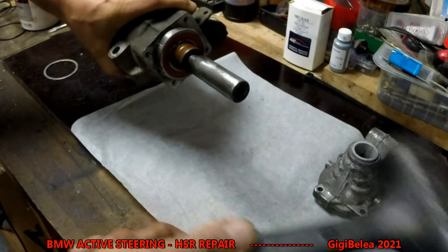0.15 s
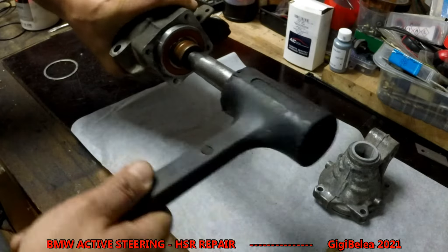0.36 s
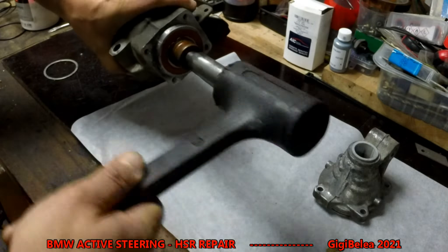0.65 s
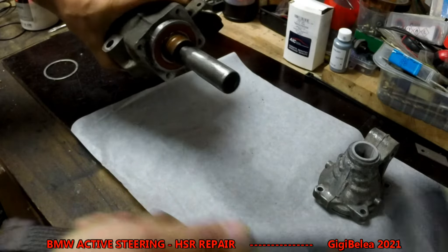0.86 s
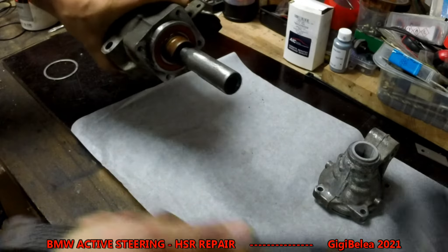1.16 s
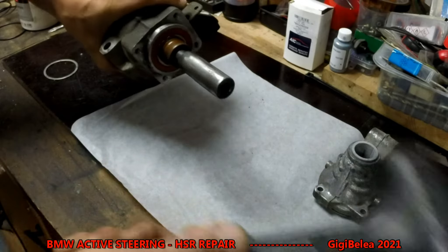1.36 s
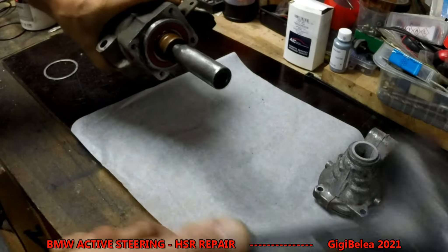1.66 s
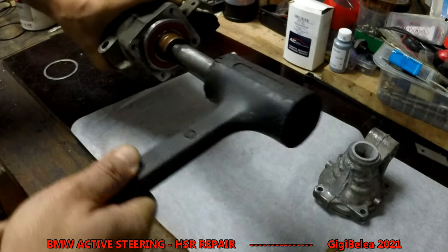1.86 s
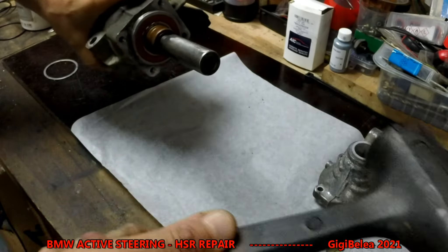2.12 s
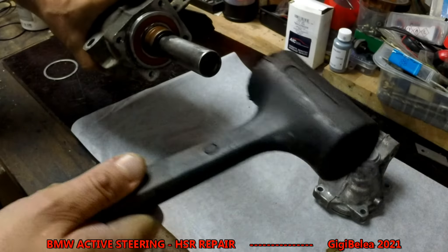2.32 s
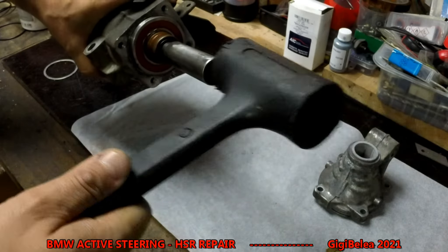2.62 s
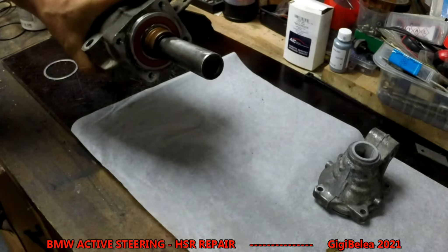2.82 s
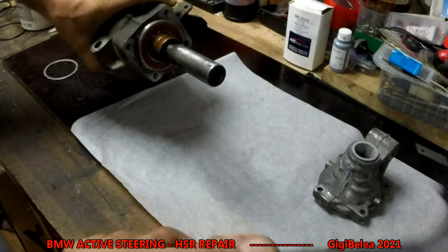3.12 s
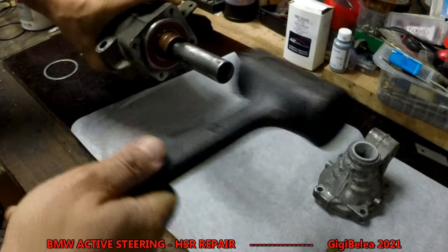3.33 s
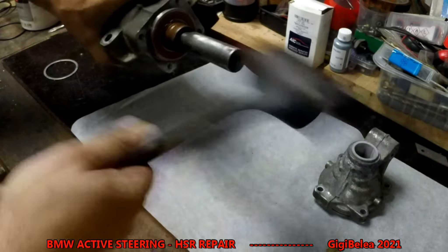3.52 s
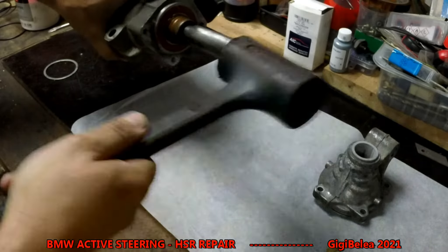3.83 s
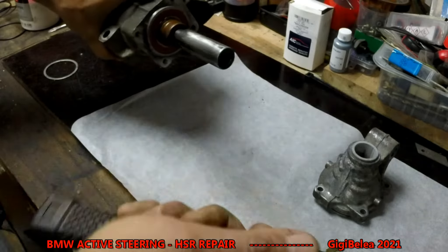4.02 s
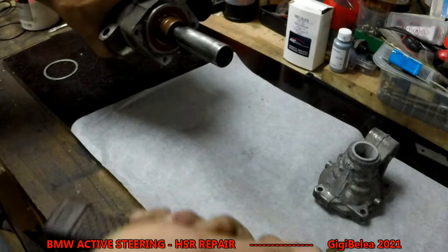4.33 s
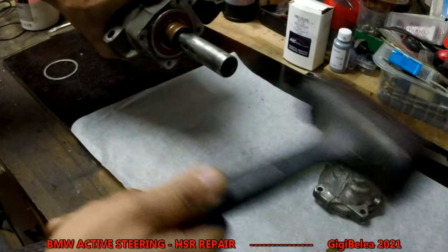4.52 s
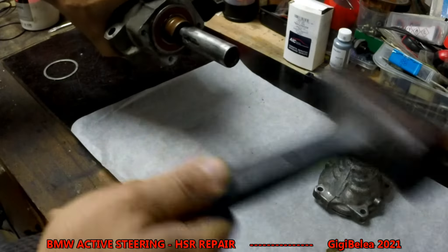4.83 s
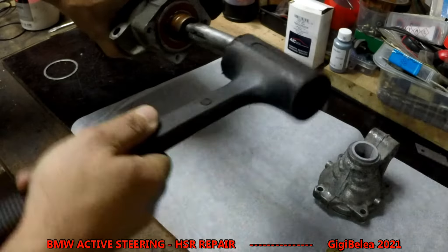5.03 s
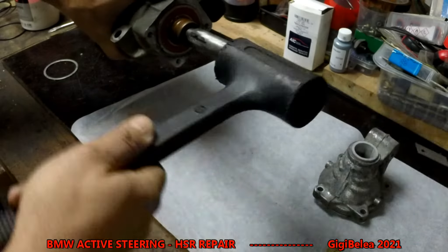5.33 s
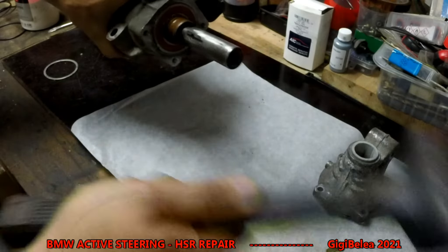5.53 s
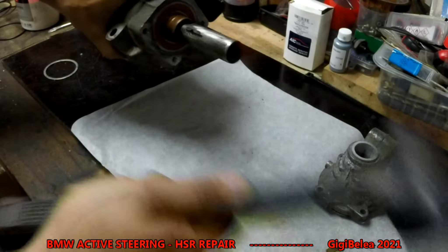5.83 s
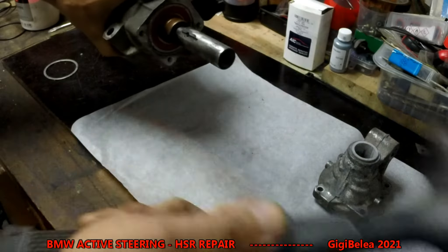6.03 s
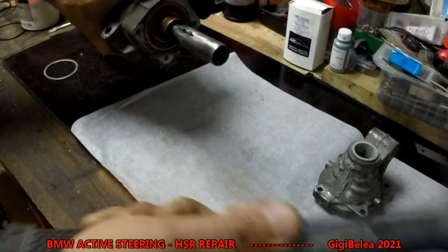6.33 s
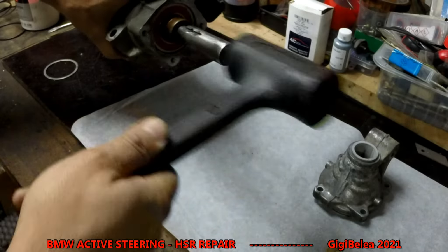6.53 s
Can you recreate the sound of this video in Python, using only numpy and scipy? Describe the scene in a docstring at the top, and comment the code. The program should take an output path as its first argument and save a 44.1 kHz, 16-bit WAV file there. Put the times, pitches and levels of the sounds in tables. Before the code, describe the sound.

A rubber hammer knocks a steel shaft in quick, even blows, pauses briefly, then carries on in a small workshop.

```python
"""A brief hiss runs into a sharp knock: a rubber dead-blow hammer is tapping a bearing along a steel
shaft into an aluminium housing, seven blows, a pause, then thirteen more. Loose shot in the hammer's
head slides back on each swing and crashes forward on impact. Each blow excites damped modes of hammer,
shaft and housing; the bench rings and a small workshop reverberates. A limiter holds the blows near
full scale and lets the room noise swell in the pause."""
import sys
import numpy as np
from scipy import signal
from scipy.fft import rfft, irfft, next_fast_len
from scipy.io import wavfile
from scipy.ndimage import uniform_filter1d, minimum_filter1d

SR = 44100
rng = np.random.default_rng(int(sys.argv[2]) if len(sys.argv) > 2 else 0)


def output_pcm(signal):
    """Save a mono or channel-first signal as 16-bit PCM at the path in sys.argv[1].

    Samples are clipped to [-1, 1] before scaling.
    """
    pcm = np.clip(np.atleast_2d(signal).T, -1, 1) * 32767
    wavfile.write(sys.argv[1], SR, np.round(pcm).astype(np.int16))


N = 293868

# Spectrum of the steady workshop noise: frequency_hz, density_db
AIR_SPECTRUM = [(20, -4), (45, 3.5), (100, -2.5), (250, -6.5), (1000, -15), (3000, -23.5), (7000, -33),
                (12500, -42.5), (15500, -62)]
# Spectrum of shot sliding inside the head: frequency_hz, density_db
SLIDE_SPECTRUM = [(100, -6.5), (300, 1), (1200, -2.5), (2000, -1.5), (3500, -8.5), (7000, -12),
                  (10000, -18.5), (15000, -47)]
# Hammer blows, with sharpness relative to an average blow: start_s, sharpness_db
BLOWS = [(0.0574, 2.5), (0.3625, -1), (0.666, -3), (0.9686, 0.9), (1.2677, 0.5), (1.5622, 4.5), (1.8633, 1),
         (2.993, 1.6), (3.3017, 3.5), (3.5981, -2.5), (3.8866, 4.5), (4.18, -1.5), (4.473, 1),
         (4.7643, -0.7), (5.0549, 0.1), (5.347, -1.4), (5.6355, 1.4), (5.9298, -2), (6.2206, -5),
         (6.5151, -1)]
# Hand-damped modes of hammer, shaft and housing: pitch_hz, level_db, t60_s
BODY_MODES = [(437.8, -20.5, 0.032), (529.6, -5.0, 0.027), (605, 2.5, 0.012), (570, 3.0, 0.0071),
              (829.5, -6, 0.032), (1241, -10.5, 0.018), (1267, 4, 0.005), (1711, 3.5, 0.0037),
              (1904, -9.5, 0.0075)]
# Spectrum of shot striking the hammer's face: frequency_hz, density_db
CRASH_SPECTRUM = [(300, -23.5), (1200, -1.5), (2200, 0), (2800, -7), (3350, -7.5), (3700, -10.5),
                  (4300, -6.5), (5000, -12.5), (7100, -13.5), (8000, -21), (9200, -20.5), (10300, -26),
                  (11500, -36), (13500, -39), (15500, -56)]
# Faint modes of the steel shaft and bearing: pitch_hz, level_db
STEEL_MODES = [(3913, -5), (4182, -3.5), (4302, 1), (4485, -5), (4560, -3.5), (7077, -9)]
# Lingering resonances of bench and room: pitch_hz, level_db
BENCH_MODES = [(305, -19.5), (512, -3.5), (560, -6), (616, -5), (638, -7), (708, -5), (778, -6.5), (816, 1),
               (853, 0.5), (912, -5.5), (985, -7), (1009, -1.5), (1071, -9.5), (1160, -15.5)]
# Spectrum of the knock as the room returns it: frequency_hz, density_db
ECHO_SPECTRUM = [(150, -35.5), (220, -21), (310, -8), (430, -13.5), (500, 2), (700, -2), (840, 1),
                 (1000, -1.5), (1300, -13.5), (1600, -7), (2050, -15), (2900, -41.5), (6000, -68)]
# Reverberation time of the workshop: frequency_hz, t60_s
REVERB_TIMES = [(200, 0.33), (400, 0.42), (520, 0.43), (2000, 0.48), (5000, 0.67), (9000, 0.54),
                (14000, 0.19)]


def amp(db):
    """Amplitude grows tenfold for every 20 dB."""
    return 10 ** (np.asarray(db) / 20)


def unit_energy(x):
    """Normalisation: the squared samples sum to 1."""
    return x / np.sqrt(np.sum(x ** 2) + 1e-20)


def curve_at(points, hz):
    """Interpolation of (frequency_hz, value) points on a logarithmic frequency axis."""
    frequencies, values = np.transpose(points)
    return np.interp(np.log(hz + 1), np.log(frequencies), values)


def noise(spectrum, size):
    """Spectral shaping turns white noise into coloured noise of rms 1."""
    gain = amp(curve_at(spectrum, np.fft.rfftfreq(size, 1 / SR)))
    white = rfft(rng.standard_normal(size))
    return unit_energy(irfft(white * gain, size)) * np.sqrt(size)


def decay(t, t60_s):
    """Exponential decay: a free vibration loses 60 dB in t60_s."""
    return amp(-60 * t / t60_s)


def add(track, start_s, sound):
    """Superposition: a sound adds to the track from start_s, trimmed at both ends."""
    start = round(start_s * SR)
    part = sound[max(-start, 0):max(N - start, 0)]
    track[max(start, 0):][:len(part)] += part


def workshop_noise():
    """Stationary noise: a constant spectrum, strongest in the bass, lies under the scene."""
    return noise(AIR_SPECTRUM, N)


def shot_slides():
    """Inertia: as the hammer accelerates, the shot slides to the back of its head and hisses."""
    lead_s, rise_s, fall_s = 0.058, 0.022, 0.014  # the hiss peaks lead_s before the blow
    jitter_s, scatter_db = 0.0019, 2  # no two swings are quite alike
    t = np.arange(round(0.2 * SR)) / SR - 0.1
    swell = np.exp(-np.abs(t) / np.where(t < 0, rise_s, fall_s))
    track = np.zeros(N)
    for blow_s, _ in BLOWS:
        lateness, strength = rng.standard_normal(2)
        hiss = amp(scatter_db * strength) * swell * noise(SLIDE_SPECTRUM, len(t))
        add(track, blow_s - lead_s + jitter_s * lateness + t[0], hiss)
    return track


def housing_knock(t, hardness_db, detune, scatter_db, rubber_hz):
    """Modal vibration: an impact excites damped sinusoids, and harder contact favours the high ones."""
    hz, db, t60_s = np.transpose(BODY_MODES)[:, :, None]
    polarity = -(-1) ** np.arange(len(BODY_MODES))[:, None]  # starting sign alternates by table row
    grip = 1 + detune * rng.standard_normal()  # the hand never holds quite the same way
    tilt_db = hardness_db * np.minimum(hz / 1500, 1)
    level_db = db + tilt_db + scatter_db * rng.standard_normal(hz.shape)
    modes = polarity * amp(level_db) * decay(t, t60_s) * np.sin(2 * np.pi * hz * grip * t)
    soft_face = signal.butter(2, rubber_hz, fs=SR, output="sos")  # rubber rounds the attack
    return signal.sosfilt(soft_face, modes.sum(axis=0))


def shot_crash(t, t60_s, rise_s):
    """Inelastic collision: the shot hits the hammer's face in one burst of noise."""
    onset = 1 - np.exp(-t / rise_s)
    return unit_energy(noise(CRASH_SPECTRUM, len(t)) * decay(t, t60_s) * onset)


def resonance(t, modes, t60_s, rise_s):
    """Resonance: lightly damped modes build up after a blow and ring on at their own pitches."""
    tones = sum(amp(db) * np.sin(2 * np.pi * (hz * t + rng.random())) for hz, db in modes)
    onset = 1 - np.exp(-t / rise_s)
    return unit_energy(tones * decay(t, t60_s) * onset)


def reverb(t, spectrum, early_db, early_t60_s, rise_s):
    """Reverberation: early reflections from bench and shelves give way to a diffuse tail."""
    hz, times, bands = signal.stft(noise(spectrum, len(t)), SR, nperseg=256)
    early = amp(early_db) * decay(times, early_t60_s)
    diffuse = decay(times, curve_at(REVERB_TIMES, hz)[:, None])
    reflections = signal.istft(bands * (diffuse + early), SR, nperseg=256)[1][:len(t)]
    onset = 1 - np.exp(-(t / rise_s) ** 2)
    return unit_energy(reflections * onset)


def hammer_blows():
    """Impact excitation: a sharper blow brightens the knock and throws the shot harder."""
    beat_s = 0.302
    hardness_slope, crash_slope, settle_slope = 0.22, 1.07, 0.71  # dB per dB of sharpness
    t = np.arange(round(0.6 * SR)) / SR
    # Every blow lands on the same spot, so most of the room's answer repeats.
    echo = amp(1.5) * reverb(t, ECHO_SPECTRUM, early_db=9, early_t60_s=0.1, rise_s=0.0056)
    bench = amp(-8.5) * resonance(t, BENCH_MODES, t60_s=0.44, rise_s=0.032)
    track = np.zeros(N)
    earlier_blow = (BLOWS[0][0] - beat_s, 0)  # the tapping is already under way
    for start_s, sharpness_db in [earlier_blow, *BLOWS]:
        hardness_db = hardness_slope * sharpness_db
        knock = housing_knock(t, hardness_db, detune=0.011, scatter_db=0.35, rubber_hz=4370)
        varying_echo = amp(-6.5) * reverb(t, ECHO_SPECTRUM, early_db=10.5, early_t60_s=0.16,
                                          rise_s=0.0025)
        crash = amp(-4 + crash_slope * sharpness_db) * shot_crash(t, t60_s=0.032, rise_s=0.00047)
        crash_echo = amp(-11) * reverb(t, CRASH_SPECTRUM, early_db=13.5, early_t60_s=0.11, rise_s=0.005)
        steel = amp(-28.5) * resonance(t, STEEL_MODES, t60_s=0.4, rise_s=0.003)
        settling = amp(settle_slope * sharpness_db) * (crash_echo + steel)
        add(track, start_s, knock + crash + settling + echo + varying_echo + bench)
    return track


def scene():
    """Sound pressures add: the blows stand far above the sliding shot and the workshop noise."""
    hammer = amp(13.5) * hammer_blows() + amp(-45) * shot_slides()
    return (hammer + amp(-53) * workshop_noise())[None]


def limiter(x, hold_s, release_db_per_s):
    """Peak limiting: the gain drops ahead of a peak over full scale, holds, then climbs back."""
    ahead, held = round(0.012 * SR), round(hold_s * SR)
    allowed_db = np.minimum(-20 * np.log10(np.abs(x) + 1e-9), 0)
    allowed_db[0] = allowed_db.min()  # the gain starts low, as in mid-tapping
    window = ahead + held
    held_db = minimum_filter1d(allowed_db, window, origin=held - window // 2, mode="nearest")
    climb_db = release_db_per_s * np.arange(N) / SR
    gain_db = np.minimum.accumulate(held_db - climb_db) + climb_db
    return x * amp(uniform_filter1d(gain_db, size=128))


def record(dry):
    """Band limiting: the deepest bass is cut before the limiter, the highest treble after it."""
    low_cut_hz, high_cut_hz = 38, 15400
    highpass = signal.butter(2, low_cut_hz, "highpass", fs=SR, output="sos")
    limited = limiter(signal.sosfilt(highpass, dry[0]), hold_s=0.37, release_db_per_s=24)
    size = next_fast_len(N + SR)
    passband = np.fft.rfftfreq(size, 1 / SR) < high_cut_hz
    return irfft(rfft(limited, size) * passband, size)[None, :N]


dry = scene()
out = record(dry)
output_pcm(out)
```